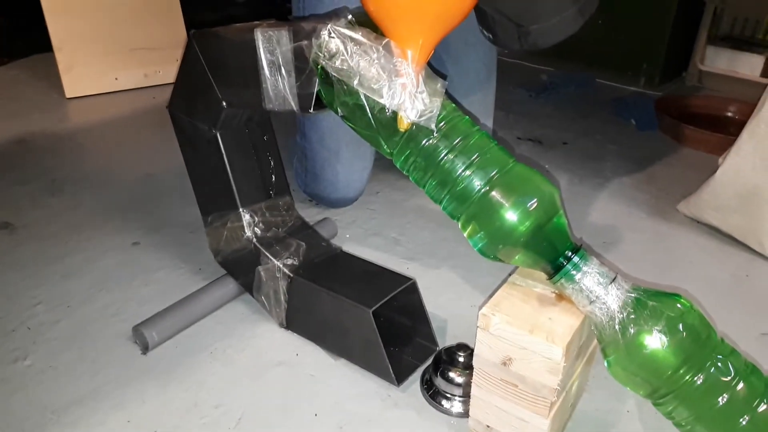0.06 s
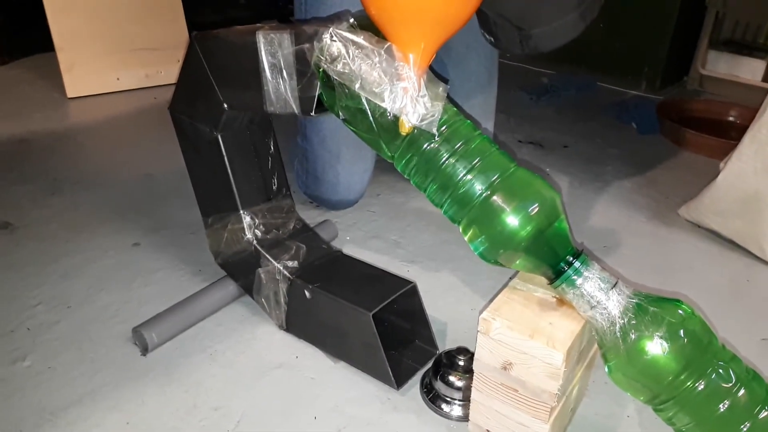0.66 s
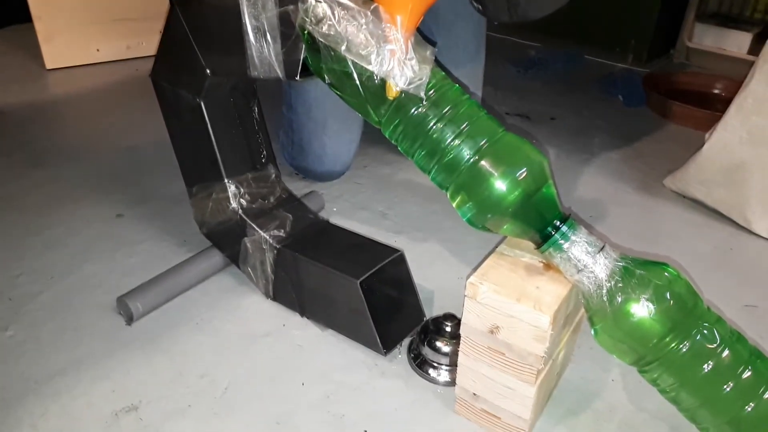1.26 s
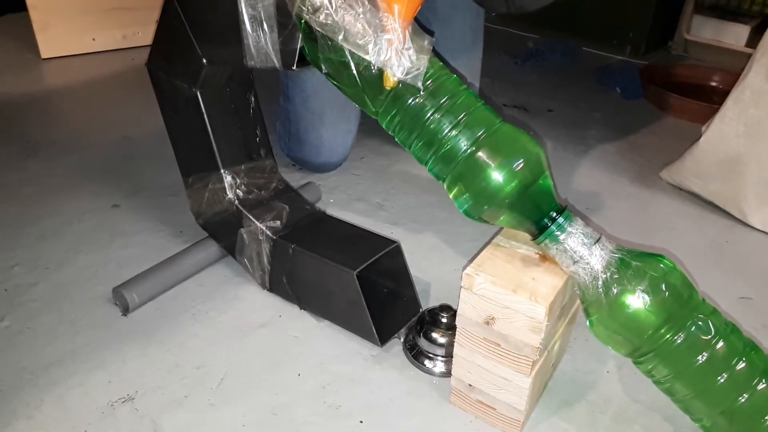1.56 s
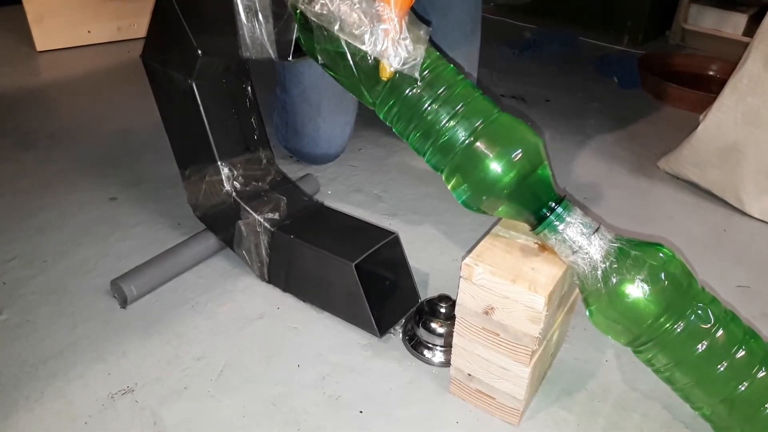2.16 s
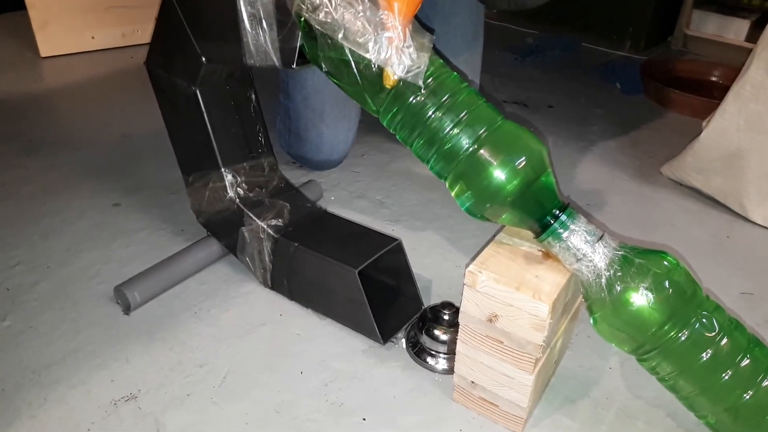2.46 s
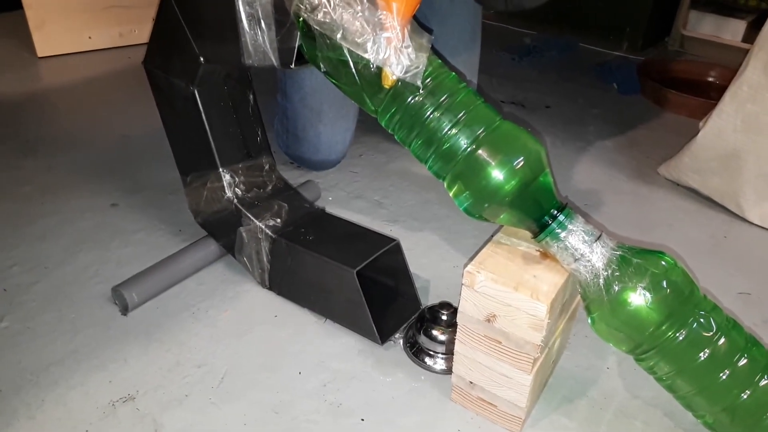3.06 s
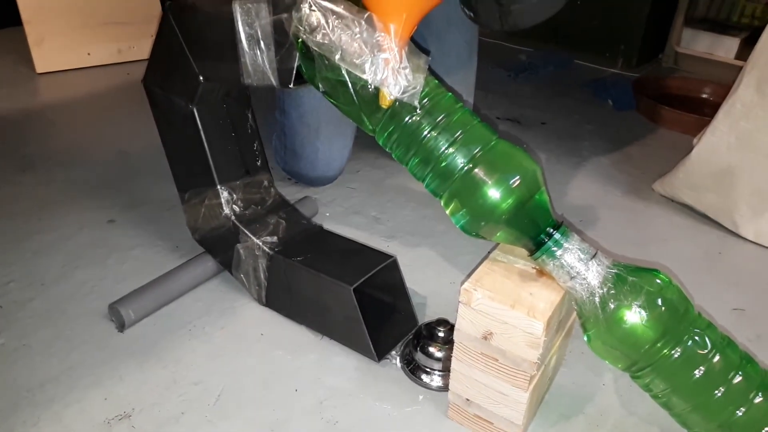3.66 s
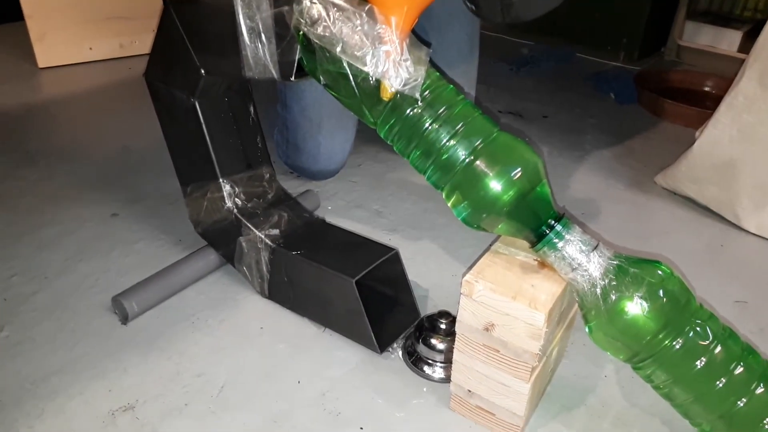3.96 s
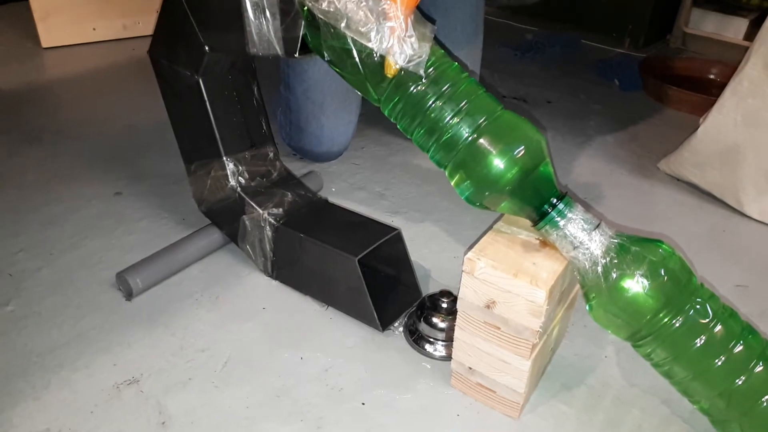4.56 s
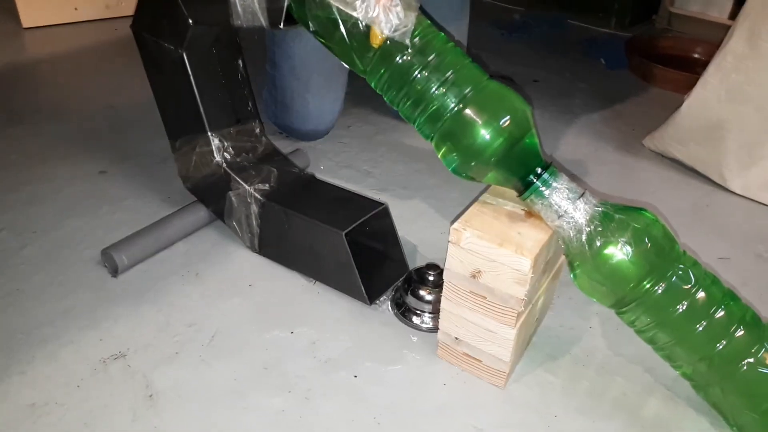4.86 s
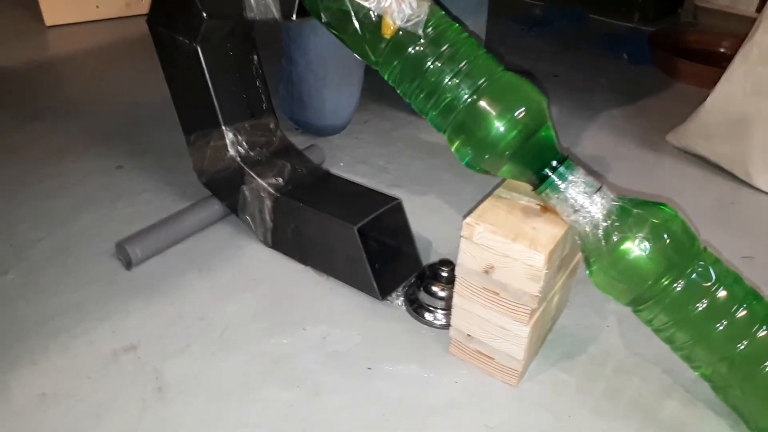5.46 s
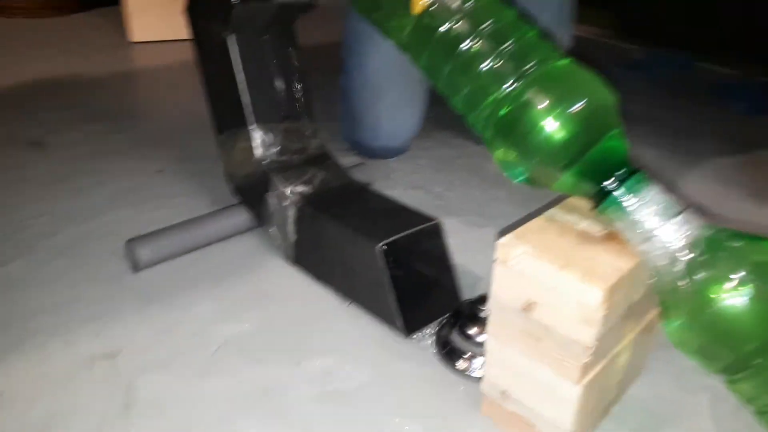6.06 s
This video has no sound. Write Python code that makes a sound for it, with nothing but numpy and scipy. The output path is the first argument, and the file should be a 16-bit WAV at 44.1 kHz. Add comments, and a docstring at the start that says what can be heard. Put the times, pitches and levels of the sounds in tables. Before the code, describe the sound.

Two loud hollow knocks of thin plastic, then water trickles and gurgles in gushes through plastic bottles, with small plinks and drips.

```python
"""On a workshop floor, water is poured through a funnel into a sloping chain of plastic bottles.
The thin plastic buckles with two loud hollow knocks as the pour begins; then the stream trickles on
in gushes. Trapped bubbles ring and rise in pitch, fine spray fizzes and drops tick on the wall.
Bottles and room echo the water, over a bed of low rumble and faint hiss."""
import sys
import numpy as np
from scipy import signal
from scipy.fft import rfft, irfft, next_fast_len
from scipy.io import wavfile
from scipy.ndimage import uniform_filter1d

SR = 44100
rng = np.random.default_rng(int(sys.argv[2]) if len(sys.argv) > 2 else 0)


def waveform_to_disk(signal):
    """Save audio, clipped to [-1, 1], as 16-bit WAV at the path in sys.argv[1]."""
    frames = np.transpose(np.atleast_2d(signal))
    scaled = np.clip(frames, -1, 1) * 32767
    samples = np.round(scaled).astype(np.int16)
    wavfile.write(sys.argv[1], SR, samples)


N = 278154
TIME = np.arange(N) / SR

# Table levels are relative: each layer has its own fader further down.
# room rumble spectrum: f/Hz, level/dB
RUMBLE_EQ = [(12, -49.5), (20, -21), (27, -38.5), (46, -7), (65, 2.5), (127, -3.5), (181, -11), (214, -18),
             (329, -18), (450, -25.5), (580, -40), (990, -120)]
# slow drift of the rumble: t/s, level/dB
RUMBLE_RIDE = [(0, -67), (1.8, -68), (2.1, -65), (2.4, -64.5), (2.7, -66.5), (3.5, -69.5), (4.3, -65.5),
               (5.4, -67), (6.31, -66.5)]
# room hiss spectrum: f/Hz, level/dB
HISS_EQ = [(180, -19.5), (300, -5.5), (1690, -8.5), (2070, -6), (2480, -40), (4300, -15.5), (16000, -21)]
# foreground bubbles, from deep glugs to high plinks: t/s, f/Hz, level/dB, t60/s
LEAD_BUBBLES = [(0.0, 1090, -50.5, 0.05), (0.114, 6140, -47, 0.0053), (0.159, 5170, -43.5, .006),
                (0.371, 4620, -22, 0.0015), (0.583, 4350, -35.5, 0.004), (0.665, 5590, -39, 0.0074),
                (0.779, 2400, -49, .047), (0.854, 1450, -51.5, 0.034), (0.903, 4290, -44, 0.014),
                (1.0, 868, -57.5, 0.077), (1.02, 857, -47.5, 0.015), (1.145, 2310, -42, 0.04),
                (1.199, 7100, -38, 0.0081), (1.264, 4250, -38.5, 0.014), (1.31, 1755, -43, 0.19),
                (1.362, 4500, -37, 0.0077), (1.391, 1570, -32.5, 0.011), (1.496, 5400, -31, .006),
                (1.608, 1970, -35, 0.0046), (1.662, 1310, -44, 0.039), (1.672, 4630, -35.5, 0.017),
                (1.674, 7800, -38.5, .007), (1.733, 3770, -31, 0.025), (1.821, 7300, -39, .008),
                (1.824, 4800, -31, 0.0014), (1.96, 1367, -43, 0.11), (2.051, 1101, -48.5, 0.11),
                (2.088, 1310, -39.5, 0.023), (2.165, 3440, -29, 0.008), (2.414, 3150, -26, 0.011),
                (2.429, 1740, -37.5, .096), (2.487, 1960, -34, 0.01), (2.774, 4580, -34, .014),
                (2.966, 7100, -28.5, 0.014), (3.207, 6820, -25, 0.0054), (3.209, 1180, -42.5, 0.014),
                (3.223, 952, -47.5, .034), (3.347, 1830, -45, 0.088), (3.36, 894, -37.5, 0.078),
                (3.515, 1356, -49.5, 0.13), (3.832, 4530, -32, 0.0054), (3.91, 894, -55, 0.082),
                (3.912, 6800, -34, 0.0065), (4.206, 1310, -40.5, 0.0072), (4.267, 3950, -27.5, .0095),
                (4.406, 3640, -32.5, 0.0084), (4.439, 910, -43.5, 0.038), (4.602, 3840, -32.5, 0.0046),
                (4.689, 960, -44.5, 0.024), (4.732, 6700, -33.5, 0.018), (4.761, 3080, -32.5, .01),
                (4.817, 4335, -22.5, 0.015), (4.939, 6900, -35, 0.017), (4.955, 916, -46.5, 0.088),
                (4.995, 1523, -42.5, .049), (5.082, 1640, -41.5, 0.025), (5.211, 2530, -38.5, 0.065),
                (5.286, 933, -48, .014), (5.297, 1935, -38, .022), (5.37, 815, -43.5, 0.015),
                (5.396, 860, -48.5, .041), (5.463, 1315, -41, 0.024), (5.513, 938, -37, 0.015),
                (5.583, 3850, -31, 0.011), (5.61, 4130, -26, 0.0039), (5.612, 6230, -34, .011),
                (5.716, 3700, -37, .017), (5.731, 766, -45, 0.038), (5.853, 3800, -39.5, 0.059),
                (5.925, 1270, -39.5, 0.012), (5.976, 6500, -27.5, 0.0035), (6.031, 1110, -33.5, 0.0088),
                (6.045, 3420, -31, .01), (6.07, 1613, -39, 0.05), (6.12, 1073, -39.5, 0.015),
                (6.132, 2480, -31, 0.013), (6.194, 7600, -31, 0.0099), (6.292, 4850, -29.5, .012),
                (6.297, 7000, -26.5, .007)]
# the running stream: t/s, churn level/dB, small-bubble level/dB, spray level/dB
STREAM_RIDE = [(0.0, -67.5, -80, -107), (0.24, -85, -73.5, -76), (0.32, -56, -53.5, -67),
               (0.57, -80, -53, -63.5), (0.72, -74, -74, -71), (0.87, -64.5, -56.5, -68.5),
               (1.02, -89, -70, -73.5), (1.25, -78, -64.5, -68), (1.6, -65.5, -60.5, -68),
               (2.05, -54, -69, -66), (2.33, -57, -54, -65), (3.05, -58.5, -64, -68.5),
               (3.3, -59.5, -53, -64), (3.55, -64, -67, -65.5), (4.1, -58.5, -58.5, -69),
               (4.5, -53.5, -60.5, -70.5), (4.78, -52.5, -52, -69.5), (4.9, -69, -65, -62.5),
               (5.05, -58, -57, -66.5), (5.4, -60.5, -56, -70), (5.62, -62, -50, -60),
               (5.95, -54.5, -57.5, -62), (6.31, -58, -49.5, -62.5)]
# slugs of water plunging into the pool: t/s, length/s, churn level/dB, small-bubble level/dB, f/Hz
GUSH_CUES = [(0.12, 0.04, -57, -70, 1830), (0.759, 0.035, -59.5, -51, 2150), (1.311, .11, -49, -58, 1820),
             (1.507, 0.15, -52, -56.5, 1734), (1.736, 0.033, -57, -52.5, 1720),
             (1.845, 0.078, -51.5, -58.5, 1600), (2.117, .1, -53, -56.5, 1485),
             (2.409, 0.18, -50, -56, 1706), (2.575, 0.046, -49.5, -79, 1770),
             (2.699, 0.12, -50.5, -53, 1630), (2.965, 0.057, -51, -57.5, 1390),
             (3.126, 0.047, -46, -49, 1497), (3.351, 0.067, -49, -49.5, 1950),
             (3.474, 0.065, -55, -86, 1285), (3.613, 0.045, -54.5, -54, 1790),
             (3.723, 0.017, -47, -53.5, 1810), (3.822, 0.035, -48.5, -49, 1680),
             (3.948, 0.15, -47, -50, 1605), (4.223, 0.05, -59, -78, 1330), (4.431, 0.092, -47, -55, 1210),
             (4.61, .1, -57.5, -50.5, 1300), (4.955, .12, -50.5, -51, 1624),
             (5.118, 0.13, -57.5, -52, 1860), (5.282, 0.052, -45.5, -62, 1930),
             (5.43, 0.12, -51, -47.5, 1460), (5.777, 0.14, -46, -50, 1570),
             (6.097, 0.068, -44.5, -44.5, 1724)]
# tone of the small bubbles: f/Hz, level/dB
FIZZ_EQ = [(1180, -41), (2000, -7.5), (2170, -7), (2780, -6), (3180, -1), (4310, -3), (5270, -7),
           (7240, 0.5), (8570, -10.5), (10000, -46), (13000, -39.5), (22000, -120)]
# tone of the fine spray: f/Hz, level/dB
SPRAY_EQ = [(200, -12), (600, -4.5), (1500, 9.5), (3000, 6), (7000, 11.5), (9000, -22), (13000, 3.5),
            (16000, 2)]
# the two knocks: t/s, clatter level/dB, clatter tilt/(dB per octave), swell/s, crack level/dB
KNOCK_CUES = [(0.3367, -24, -5.5, 0.0052, -42), (0.4481, -21.5, -0.5, 0.0023, -29)]
# wall modes, hit at two spots: f/Hz, t60/s before damping, first-knock level/dB, second-knock level/dB
WALL_MODES = [(813, 0.33, -27.0, -36.0), (938, 0.3, -33.0, -33.0), (1074, 0.2, -19.0, -15.0),
              (1113, 0.16, -17.0, -23.0), (1220, 0.2, -29.0, -33.0), (1318, 0.2, -31.0, -33.0),
              (1367, 0.26, -44.0, -27.0), (1448, 0.29, -27.0, -16.0), (1478, 0.25, -29.0, -18.0),
              (1533, 0.24, -26.0, -27.0), (1565, 0.24, -24.0, -27.0), (1740, 0.17, -39.0, -23.0),
              (1790, 0.2, -24.0, -18.0), (1858, 0.2, -31.0, -24.0), (1962, 0.18, -27.0, -22.0),
              (2005, 0.2, -31.0, -25.0), (2783, 0.17, -32.0, -33.0)]
# spectrum of the wall's dense, weaker modes: f/Hz, level/dB
CLATTER_EQ = [(150, -44), (300, -29.5), (520, -20), (700, -18), (950, -3.5), (1500, -0.5), (2000, 2.5),
              (2400, -11), (3900, -4), (5200, -30), (7000, -26), (9000, -39.5), (13000, -37),
              (16000, -47.5)]
# ring time of those modes: f/Hz, t60/s
CLATTER_DECAY = [(400, 0.2), (1500, 0.3), (4000, 0.14), (13000, 0.99)]
# tone of the crack that starts a knock: f/Hz, level/dB
CRACK_EQ = [(400, -33), (1200, 7.5), (4000, 7.5), (7000, 7.5), (9000, -10), (13000, 3.5), (16000, -12)]
# the heaviest drops on the plastic: t/s, level/dB
DROP_CUES = [(0.5453, -41), (0.803, -42.5), (1.118, -43), (1.3606, -45.5), (1.4934, -45), (1.733, -48),
             (2.1788, -43), (2.41, -46.5), (2.731, -48.5), (2.9655, -47), (3.2067, -44.5), (3.6045, -50),
             (4.3526, -44), (4.642, -45.5), (4.871, -40.5), (5.1752, -41), (5.3402, -45), (5.535, -45.5),
             (5.7604, -40.5), (6.0236, -41.5), (6.147, -42), (6.2137, -32.5), (6.2934, -43)]
# tone of a drop's splat: f/Hz, level/dB
DROP_EQ = [(600, -23.5), (1500, -13.5), (3500, -6), (7000, 1), (9000, -11.5), (13000, -2), (16000, -10)]
# echoes inside the bottles: f/Hz, t60/s
BOTTLE_DECAY = [(500, 0.044), (850, 0.091), (1500, 0.11), (3000, 0.078), (7000, 0.047), (15000, 0.034)]
# the workshop's reverb tail: f/Hz, t60/s
ROOM_DECAY = [(300, 0.47), (1500, 0.092), (4000, 0.097), (8000, 0.11), (15000, 0.17)]
# stereo balance, the left side facing the bottles: f/Hz, left-minus-right level/dB
BALANCE_EQ = [(100, -21), (350, -4), (750, 3.5), (1300, 1), (2400, 0.5), (4400, 8), (7500, 4), (9500, -3),
              (15000, 5)]

PLACES = 5  # spots along the bottles where water sounds
PLINKS_PER_S, PLINK_DB = 8, 15  # light plinks: rate, lift over the stream's small-bubble curve
PLINK_LOW_HZ, PLINK_HIGH_HZ, PLINK_CYCLES = 3980, 8110, 60
PATTER_PER_S, PATTER_DB = 6, 17  # light drops: rate, lift over the stream's spray curve
GUSH_ATTACK_S, GUSH_RELEASE_S, GUSH_OCTAVES_PER_S = 0.0038, 0.025, 1.38
POOL_HZ = 1518  # typical bubble pitch between gushes


def amp(db):
    """Turns decibels into gain."""
    return 10 ** (np.asarray(db) / 20)


def unit(x):
    """Scales to rms 1."""
    return x / np.sqrt(np.mean(x ** 2) + 1e-20)


def at_hz(points, hz):
    """Looks up a table on a log-frequency axis."""
    f, value = np.transpose(points)
    return np.interp(np.log(hz + 1), np.log(f + 1), value)


def curves(rows):
    """Draws a timed table's columns as curves, one value a sample."""
    s, *columns = np.transpose(rows)
    return [np.interp(TIME, s, column) for column in columns]


def add(mix, s, sound):
    """Lays a sound into the mix at s seconds."""
    part = mix[..., max(round(s * SR), 0):][..., :sound.shape[-1]]
    part += sound[..., :part.shape[-1]]


def eq(x, points, amount=1):
    """Minimum-phase EQ, so clicks keep their sharp front."""
    log_gain = np.log(amp(amount * at_hz(points, abs(np.fft.fftfreq(4096, 1 / SR)))))
    taps = np.fft.ifft(np.exp(np.conj(signal.hilbert(log_gain)))).real[:2048]
    return signal.oaconvolve(x, taps.reshape((1,) * (x.ndim - 1) + (-1,)), axes=-1)[..., :x.shape[-1]]


def pair(two, same):
    """Narrows two unrelated channels: same=0 is wide, 1 is mono."""
    return np.array([two[0], same * two[0] + np.sqrt(1 - same ** 2) * two[1]])


def band_decay(x, t60s):
    """Lets each band die at its own speed."""
    hz, t, bands = signal.stft(x, SR, nperseg=256)
    fade = 1000 ** (-t / at_hz(t60s, hz)[:, None])
    return signal.istft(bands * fade, SR, nperseg=256)[1][:, :x.shape[1]]


def steady(x, seconds):
    """Levels out slow swings of the summed power and keeps the grain."""
    size, total = int(seconds * SR / 2) + 1, (x ** 2).sum(0)
    power = uniform_filter1d(uniform_filter1d(total, size), size)
    return x / np.sqrt(abs(power) + .02 * total.mean())


def drips(per_s, level_db, scatter_db=3.5):
    """Loosely regular cues that follow a level curve: t/s, level/dB, a random share 0-1."""
    slip, size, share = rng.random((200, 3)).T
    s = (np.arange(len(slip)) + slip) / per_s
    db = np.interp(s, TIME, level_db) + scatter_db * (2 * size - 1)
    return np.transpose([s, db, share])[s < TIME[-1]]


def echoes(t60s, start_s, same):
    """Sparse stereo reflections of random sign, each band dying at its own speed."""
    t = np.arange(SR // 3) / SR
    signs = rng.choice([-1., 1.], (2, len(t)))
    taps = signs * (rng.random((2, len(t))) < 7000 / SR) * (t > start_s)
    return unit(band_decay(pair(taps, same), t60s)) / np.sqrt(len(t))


def room_tone(rumble_db, hiss_db):
    """The workshop's bed: a drifting low rumble and a faint, wide hiss."""
    size = next_fast_len(N, real=True)
    hz = np.fft.rfftfreq(size, 1 / SR)
    noise = pair(rng.standard_normal((2, size)), same=0.8)
    rumble = irfft(rfft(noise) * amp(at_hz(RUMBLE_EQ, hz)), size)[:, :N]
    hiss = eq(pair(rng.standard_normal((2, N)), same=0.21), HISS_EQ)
    return amp(curves(RUMBLE_RIDE)[0] + rumble_db) * unit(rumble) + amp(hiss_db) * unit(hiss)


def bubble(hz, t60, rise):
    """An air pocket pinches off, rings, and climbs in pitch as it nears the surface."""
    t60 = max(t60, .002)
    t = np.arange(int(t60 * SR)) / SR
    pinch_cycles = 1.5 + 1600 / hz  # large pockets start softly
    envelope = (1 - np.exp(-(t * hz / pinch_cycles) ** 2)) * 1000 ** (-t / t60)
    glide = 1 + rise * (t / t60 - 1 / 6)
    return envelope / envelope.max() * np.sin(2 * np.pi * hz * np.cumsum(glide) / SR)


def plinks_and_glugs(glug_boost_db, echo_db, brood_db):
    """Single bubbles ring out, each with a brood of four short ones and its own bottle echo."""
    out, t = np.zeros((2, N)), np.arange(SR // 8) / SR
    when, light_db, share = drips(PLINKS_PER_S, curves(STREAM_RIDE)[1] + PLINK_DB).T
    pitch = PLINK_LOW_HZ * (PLINK_HIGH_HZ / PLINK_LOW_HZ) ** share
    light = zip(when, pitch, light_db, PLINK_CYCLES / pitch)
    for s, hz, db, t60 in list(LEAD_BUBBLES) + list(light):
        rise = (.05 + .6 * rng.random() ** 3) * hz / 4500
        plink = np.zeros(len(t))
        add(plink, 0, bubble(hz, t60, rise))
        for late, small in rng.random((4, 2)):
            brood_hz = hz * (7400 / hz) ** small ** 2
            add(plink, 0.0023 + 0.026 * late, amp(brood_db) * bubble(brood_hz, 14 / hz, rise))
        tail = pair(rng.standard_normal((2, len(t))), same=0.45) * 1000 ** (-t / at_hz(BOTTLE_DECAY, hz))
        echo = unit(signal.fftconvolve(plink[None], tail, axes=1)[:, :len(t)]) * plink.std()
        direct = np.array([plink, np.roll(plink, rng.integers(4))])  # the right is a little further
        heard = direct + amp(echo_db) * echo
        weight_db = glug_boost_db * min(800 / hz, 1)  # large, deep pockets get more weight
        add(out, s, amp(db + weight_db) * heard / abs(heard).max(1).mean())
    return out


def swarm(per_s, pitch, octaves, cycles, size_db):
    """Many bubbles at random moments and places, pitched to either side of a curve."""
    out, draws = np.zeros((PLACES, N)), rng.random((6000, 6))
    for when, where, detune, big, sustain, steep in draws[:int(per_s * N / SR)]:
        hz = pitch[int(when * N)] * 2 ** (octaves * (2 * detune - 1))
        gain = amp(size_db * min(-np.log(1 - big), 4))
        t60 = cycles * (.5 + sustain) / hz
        rise = steep ** 2 * min(hz / 14000, .4)
        add(out[int(where * PLACES)], when * N / SR, gain * bubble(hz, t60, rise))
    return out


def spurts(depth_db, step_s):
    """The random wobble of the stream, as a gain."""
    steps = np.clip(rng.standard_normal(600), -1.5, 1.5)
    return amp(depth_db * np.interp(TIME / step_s, np.arange(len(steps)), steps))


def trickle(pool_db, fizz_db, spray_db, sparkle_db):
    """Large bubbles churn, small ones fizz and mist follows the stream; gushes stir churn and fizz."""
    churn_db, small_db, mist_db = curves(STREAM_RIDE)
    churn_power, small_power, pitch = gushes()
    wobble = spurts(depth_db=3.5, step_s=0.04)
    churn_gain = amp(pool_db) * np.sqrt((amp(churn_db) * wobble) ** 2 + churn_power)
    fizz_gain = amp(fizz_db) * np.sqrt((amp(small_db) * wobble) ** 2 + small_power)
    pool = swarm(per_s=200, pitch=pitch, octaves=0.349, cycles=29.5, size_db=2.0)
    fizz = eq(swarm(per_s=450, pitch=np.full(N, 4300), octaves=1.0, cycles=8, size_db=8.0), FIZZ_EQ)
    sparkle = swarm(per_s=260, pitch=np.full(N, 11800), octaves=0.38, cycles=24, size_db=3.5)
    mist = amp(spray_db) * spray() + amp(sparkle_db) * steady(sparkle, seconds=0.29)
    bubbling = churn_gain * steady(pool, seconds=0.061) + fizz_gain * steady(fizz, seconds=0.04)
    return bubbling + amp(mist_db) * wobble * mist


def gushes():
    """Slugs of water swell, hold and fade: curves of churn power, small-bubble power and pool pitch."""
    s, length, churn_db, small_db, hz = np.transpose(GUSH_CUES)[:, :, None]
    t = TIME[::32]
    attack = np.clip((t - s) / GUSH_ATTACK_S, 0, 1)
    envelope = attack * np.exp(-np.maximum(t - s - length, 0) / GUSH_RELEASE_S)
    churn, small = (amp(churn_db) * envelope) ** 2, (amp(small_db) * envelope) ** 2
    calm = amp(np.interp(t, TIME, curves(STREAM_RIDE)[0])) ** 2
    # pitch climbs through a gush as its bubbles near the surface
    glide = 2 ** (GUSH_OCTAVES_PER_S * (np.clip(t - s, 0, length) - length / 2))
    pitch = ((churn * hz * glide).sum(0) + calm * POOL_HZ) / (churn.sum(0) + calm)
    return [np.interp(TIME, t, curve) for curve in (churn.sum(0), small.sum(0), pitch)]


def spray(count=12000):
    """Fine specks of water land as a dense crackle of tiny clicks."""
    specks = np.zeros((PLACES, N))
    when, where = rng.random((2, count))
    clicks = rng.standard_normal(count) * amp(5 * np.minimum(rng.exponential(1, count), 4))
    specks[(where * PLACES).astype(int), (when * N).astype(int)] = clicks
    return steady(eq(specks, SPRAY_EQ), seconds=0.26)


def knocks(ring_db, damping):
    """The thin wall buckles: a crack, then its modes swell with the air inside and die away."""
    out, t = np.zeros((2, N)), np.arange(SR * 3 // 5) / SR
    hz, t60, *strikes = np.transpose(WALL_MODES)[:, :, None]
    for (s, clatter_db, tilt_db, swell_s, crack_db), mode_db in zip(KNOCK_CUES, strikes):
        phase = 2 * np.pi * rng.random(hz.shape) + .5 * rng.standard_normal((2,) + hz.shape)
        envelopes = amp(mode_db + ring_db) * 1000 ** (-damping * t / t60)
        ring = (envelopes * np.sin(2 * np.pi * hz * t + phase)).sum(1)
        tilt = [(f, tilt_db * np.log2(f / 1200)) for f in (700, 2400)]
        noise = pair(rng.standard_normal((2, len(t))), same=0.15)
        clatter = unit(eq(eq(noise, CLATTER_EQ), tilt))
        body = ring + amp(clatter_db) * band_decay(clatter, CLATTER_DECAY)
        bump = 1 + 0.19 * np.exp(-((t - .018) / 0.0067) ** 2)  # floor and far end of the bottle answer
        crack = amp(crack_db) * unit(eq(rng.standard_normal((2, len(t))), CRACK_EQ)) * np.exp(-t / 0.012)
        add(out, s, body * bump * (1 - np.exp(-t / swell_s)) + crack)
    return out


def drops(level_db, splat_s):
    """Each drop slaps the plastic with a tight splat; light ones patter between the heavy ones."""
    out, t = np.zeros((PLACES, N)), np.arange(SR // 50) / SR
    light = drips(PATTER_PER_S, curves(STREAM_RIDE)[2] + PATTER_DB)[:, :2]
    for s, db in list(DROP_CUES) + list(light):
        place = rng.integers(PLACES)
        splat = rng.standard_normal(len(t)) * np.exp(-t / splat_s)
        add(out[place], s, amp(db + level_db) * splat)
    return eq(out, DROP_EQ)


def bottle_echoes(sources, wet_db):
    """Each place along the bottles reaches the ears directly and through its own inner echoes."""
    out = np.zeros((2, N))
    for place, x in enumerate(sources):
        path = amp(wet_db) * echoes(BOTTLE_DECAY, start_s=0.0006, same=0.057)
        path[0, 0] += 1
        path[1, place % 4] += 1  # a lag of 0-3 samples on the right gives direction
        out += signal.oaconvolve(x[None], path, axes=1)[:, :N]
    return out


def workshop_reverb(x, wet_db):
    """The workshop's reflections add a short tail."""
    tail = signal.oaconvolve(x, echoes(ROOM_DECAY, start_s=0.0089, same=0.66), axes=1)[:, :N]
    return x + amp(wet_db) * tail


def scene():
    """Mixes the echoing water and the knocks, balances left against right and adds room tone."""
    ticks = drops(level_db=7.5, splat_s=0.0023)
    stream = trickle(pool_db=-10.0, fizz_db=-4.0, spray_db=-1.5, sparkle_db=-5.5)
    water = bottle_echoes(ticks + stream, wet_db=4.0)
    water += plinks_and_glugs(glug_boost_db=5.5, echo_db=-0.5, brood_db=-11.5)
    left, right = workshop_reverb(water, wet_db=-8.0) + knocks(ring_db=-1.5, damping=1.07)
    foreground = np.array([eq(left, BALANCE_EQ, amount=0.5), eq(right, BALANCE_EQ, amount=-0.5)])
    return foreground + room_tone(rumble_db=0.5, hiss_db=-71.5)


def record(dry, cutoff_hz=15950):
    """A steep low-pass trims the very top of the mix."""
    lowpass = signal.firwin(511, cutoff_hz, window=("kaiser", 9), fs=SR)
    return signal.oaconvolve(dry, lowpass[None], "same")


dry = scene()
out = record(dry)
waveform_to_disk(out)
```